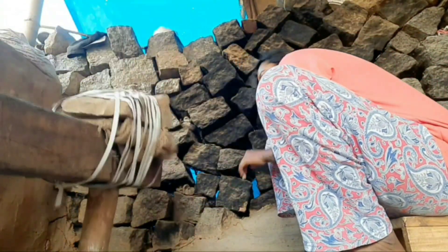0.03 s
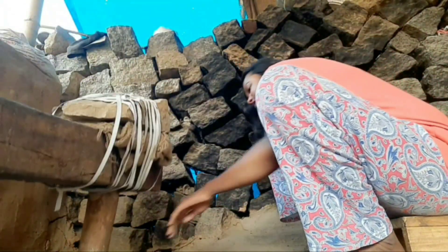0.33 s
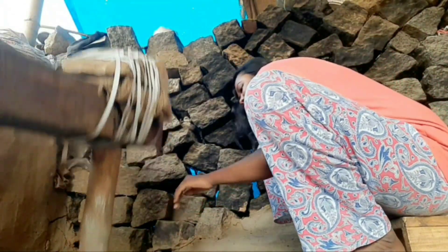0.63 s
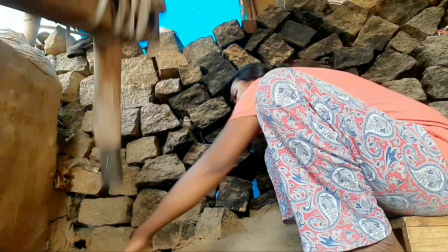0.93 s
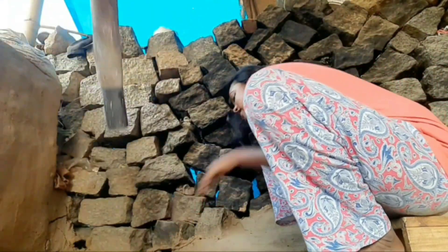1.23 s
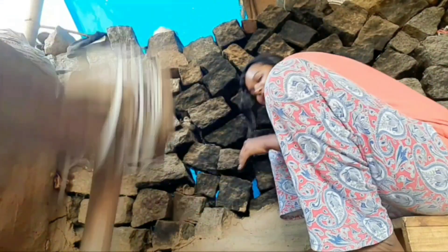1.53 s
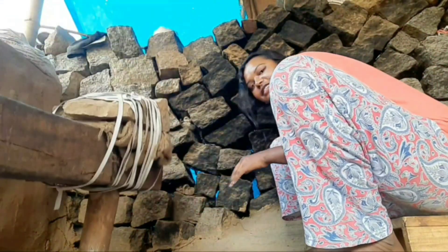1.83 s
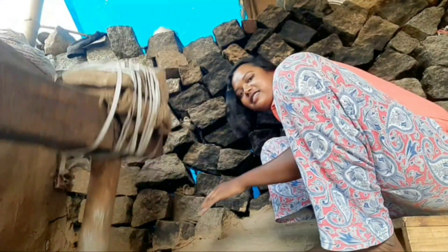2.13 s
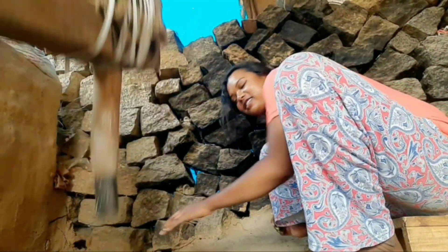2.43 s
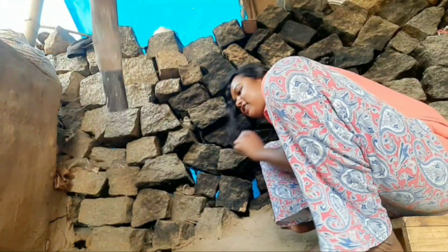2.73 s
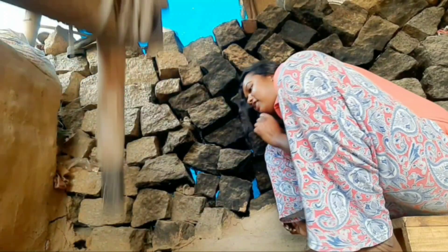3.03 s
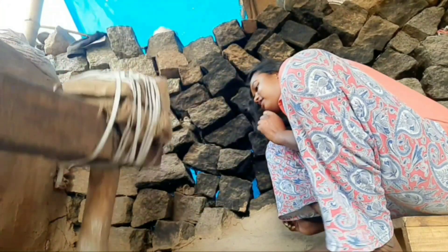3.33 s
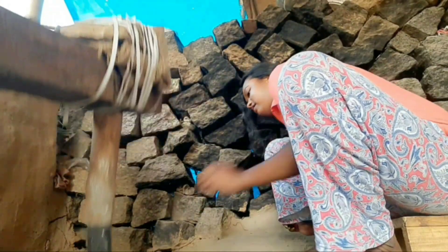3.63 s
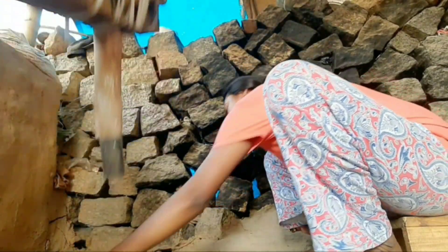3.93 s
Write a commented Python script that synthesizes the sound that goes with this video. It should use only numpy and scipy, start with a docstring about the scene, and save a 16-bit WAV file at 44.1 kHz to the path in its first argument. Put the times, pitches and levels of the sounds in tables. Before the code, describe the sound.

Low thuds of a wooden pestle beam pound meal in a steady, slow rhythm in a stone-walled yard. Two crunching blows are each followed by a short pivot squeak and faint sweeping, then a louder third blow cracks on stone.

```python
"""A stone-walled yard: a foot-worked wooden beam drops its pestle three times into a mortar of meal. Crunching
meal cushions two blows; the third strikes through hard. Beam, mortar and ground ring low, wood cracks on stone
and grit, and the beam knocks in its bearing. Between blows the dry pivot rubs and squeaks by stick-slip, the
pestle scrapes the mortar rim, and a hand sweeps the meal back. Still air and a faint low hum lie beneath."""
import sys
import numpy as np
from scipy import signal
from scipy.fft import rfft, irfft
from scipy.io import wavfile

SR = 44100
rng = np.random.default_rng(int(sys.argv[2]) if len(sys.argv) > 2 else 0)


def waveform_to_disk(signal):
    """Save audio, clipped to [-1, 1], as 16-bit WAV at the path in sys.argv[1]."""
    frames = np.transpose(np.atleast_2d(signal))
    scaled = np.clip(frames, -1, 1) * 32767
    samples = np.round(scaled).astype(np.int16)
    wavfile.write(sys.argv[1], SR, samples)


N = 176400
TIME_S, BIN_HZ = np.arange(N) / SR, np.fft.rfftfreq(N, 1 / SR)


def amp(db):
    """Decibels to gain."""
    return 10 ** (np.asarray(db) / 20)


def unit(x):
    """Scale to rms 1."""
    return x / np.sqrt(np.mean(x ** 2) + 1e-20)


def curve(points, at_hz=BIN_HZ):
    """Interpolate over log frequency."""
    hz, value = np.transpose(points)
    return np.interp(np.log(at_hz + 1), np.log(hz), value)


def colour(x, spectrum_db):
    """Spectral shaping, rms 1."""
    return unit(irfft(rfft(x) * amp(curve(spectrum_db)), N))


def resonate(x, hz, width_hz):
    """Two-pole resonance, rms 1."""
    return unit(irfft(rfft(x) / (1 + 2j * (BIN_HZ - hz) / width_hz) ** 2, N))


def drift(rate_hz):
    """Low-passed random wander, rms 1."""
    return unit(irfft(rfft(rng.standard_normal(N)) * np.exp(-(BIN_HZ / rate_hz) ** 2), N))


def grains(per_s, spread_db):
    """Random train of uneven clicks."""
    sign = rng.choice([-1., 1.], N)
    size = amp(spread_db * np.minimum(rng.exponential(1, N), 4))
    return sign * size * (rng.random(N) < per_s / SR)


def swell(peak_s, rise_s, fall_s):
    """Asymmetric Gaussian envelope."""
    t = TIME_S - peak_s
    return np.exp(-np.minimum((t / np.where(t < 0, rise_s, fall_s)) ** 2 / 2, 20))


def add(mix, start_s, sound):
    """Mix in at start_s."""
    part = mix[round(start_s * SR):][:len(sound)]
    part += sound[:len(part)]


# Direct-path balance: (frequency [Hz], left minus right [dB])
DIRECT_PAN = [(60, 1.6), (200, 3.3), (450, 2.9), (1300, 11.8), (2000, 7.5), (4000, 15), (13000, 7.4)]
RIGHT_LAG_S = 0.0003753


def direct(x, pan=DIRECT_PAN):
    """Direct path: the left microphone leads; balance varies with frequency."""
    side, spectrum = amp(curve(pan) / 2), rfft(x)
    lag = np.exp(-2j * np.pi * BIN_HZ * RIGHT_LAG_S)
    return irfft(np.array([spectrum * side, spectrum / side * lag]), N)


# Scattered source: (frequency [Hz], left-right coherence [0..1])
COHERENCE = [(150, 0.86), (450, 1), (1300, 0.54), (2500, .25), (5000, .05)]


def scattered(source, pan):
    """Spread source: the channels agree in the bass, differ in the treble."""
    coherence = np.clip(curve(COHERENCE), 0, 1)
    left, independent = rfft(source()), rfft(source())
    lag = np.exp(-2j * np.pi * BIN_HZ * RIGHT_LAG_S)
    right = coherence * left * lag + np.sqrt(1 - coherence ** 2) * independent
    side = amp(curve(pan) / 2)
    return irfft(np.array([left * side, right / side]), N)


# Yard decay: (frequency [Hz], t60 [s])
WALL_DECAY = [(60, 0.38), (300, .3), (700, 0.24), (1300, 0.22), (3000, 0.25), (8000, 0.28), (16000, 0.2)]


def walls(x):
    """Short diffuse tail off the stone walls."""
    taps = rng.standard_normal((2, SR // 2)) * (rng.random((2, SR // 2)) < .1)
    taps[:, :round(.004 * SR)] = 0
    hz, t, frames = signal.stft(taps, SR, nperseg=256)
    tail = signal.istft(frames * amp(-60 * t / curve(WALL_DECAY, hz)[:, None]), SR, nperseg=256)[1]
    tail /= np.linalg.norm(tail, axis=1, keepdims=True)
    return signal.fftconvolve(np.atleast_2d(x), tail, axes=1)[:, :N]


def yard(x, walls_db, pan=DIRECT_PAN):
    """Direct path plus walls."""
    return direct(x, pan) + amp(walls_db) * walls(x)


# Air noise: (frequency [Hz], relative density [dB])
AIR_SPECTRUM = [(15, -42), (25, -15.5), (58, -8.5), (86, -0.5), (194, -20), (307, -19.5), (486, -27),
                (710, -25.5), (1120, -33), (1280, -31), (3220, -40), (7830, -39), (9460, -44),
                (14600, -39.5), (15800, -44)]


def still_air(level_db=-68):
    """Outdoor noise floor, near mono in the bass."""
    common, separate = rfft(rng.standard_normal(N)), rfft(rng.standard_normal((2, N)))
    share = curve([(100, 0.93), (500, 0.66), (2000, 0.031)])
    noise = irfft(common * np.sqrt(share) + separate * np.sqrt(1 - share), N)
    return amp(level_db) * colour(noise, AIR_SPECTRUM)


# Hum partials: (frequency [Hz], level [dB])
HUM_TONES = [(74, -66), (91, -65)]
# Hum envelope: (time [s], gain [dB])
HUM_GAIN = [(0, -2), (.7, 3.5), (1.3, 3), (2.3, 3), (2.8, -6), (3.3, -12), (4, -14.5)]


def hum(waver_hz=1.5):
    """Two faint low tones, wavering in pitch."""
    tones = sum(amp(db) * np.sin(2 * np.pi * np.cumsum(hz + waver_hz * drift(3.2)) / SR)
                for hz, db in HUM_TONES)
    return direct(tones * amp(np.interp(TIME_S, *np.transpose(HUM_GAIN))))


# Dry wood rubbing at the pivot and the pestle scraping the mortar rim: (peak time [s], rise [s], fall [s],
# level [dB], resonance [Hz], width [Hz])
RUBS_AND_SCRAPES = [(.07, 0.097, 0.081, -72, 1316, 68.6), (0.018, 0.033, 0.028, -68.5, 725, 1260),
                    (.26, 0.043, 0.059, -63.5, 1294, 113), (0.242, 0.02, 0.02, -63.5, 460, 122),
                    (0.293, 0.011, 0.0053, -47.5, 1140, 1020), (.72, 0.038, 0.05, -82.5, 2650, 500),
                    (.95, 0.014, 0.029, -91, 3970, 600), (.86, .015, .02, -77, 640, 195),
                    (1.135, .025, 0.026, -66, 794, 140), (1.17, 0.0035, 0.019, -55.5, 480, 493),
                    (1.235, 0.032, 0.13, -61, 795, 142), (1.35, 0.075, 0.023, -57.5, 408, 93),
                    (1.3, 0.085, 0.11, -66.5, 171, 204), (1.29, 0.051, 0.22, -65, 1880, 590),
                    (1.55, 0.04, 0.11, -69, 1996, 400), (1.781, 0.047, 0.14, -73.5, 1890, 400),
                    (2.78, 0.041, 0.071, -70.5, 1990, 500), (1.781, 0.011, 0.05, -56, 514, 423),
                    (1.871, 0.0073, 0.039, -57.5, 1334, 170), (1.907, 0.0031, 0.028, -45, 1170, 1150),
                    (1.939, .015, 0.018, -40.5, 401, 89), (2.391, 0.022, 0.065, -70.5, 600, 608),
                    (2.39, 0.024, 0.032, -80, 2222, 700), (2.5, 0.11, 0.33, -84, 1760, 123),
                    (2.62, 0.023, 0.032, -67, 880, 450), (2.76, 0.051, 0.089, -59.5, 794, 122),
                    (2.915, .035, 0.016, -51, 435, 90), (2.921, 0.026, 0.045, -45.5, 1333, 69),
                    (2.942, 0.05, 0.079, -63.5, 1933, 660), (2.98, 0.049, .06, -59, 648, 710),
                    (3.182, 0.019, 0.048, -67.5, 883, 202), (3.25, 0.011, 0.022, -82, 3000, 2020),
                    (3.544, 0.0037, 0.011, -39, 1210, 820), (3.4, 0.0077, 0.034, -61.5, 650, 602),
                    (3.52, 0.039, 0.022, -58.5, 474, 128.5), (3.531, 0.035, 0.024, -60, 1246, 450),
                    (3.883, 0.012, 0.028, -63.5, 880, 336), (3.89, 0.033, 0.03, -74.5, 414, 150)]


def rubs_and_scrapes():
    """Irregular slips excite one wood resonance per rub or scrape."""
    slips = grains(per_s=1500, spread_db=3.5)
    rubbing = sum(amp(db) * swell(peak_s, rise_s, fall_s) * resonate(slips, hz, width_hz)
                  for peak_s, rise_s, fall_s, db, hz, width_hz in RUBS_AND_SCRAPES)
    return yard(rubbing, walls_db=-4.5)


# Meal under the pestle: (start [s], rise [s], hold [s], release t60 [s], level [dB])
MEAL_CRUSHES = [(0.272, .05, 0.046, 0.22, -37), (1.884, 0.047, 0.027, 0.4, -38),
                (3.541, .014, 0.021, 0.21, -29.5)]
# Breaking grains: (frequency [Hz], relative density [dB])
CRUNCH_SPECTRUM = [(70, 2), (130, 0), (200, -16), (300, -9.5), (400, 0), (537, -11), (644, -0.5),
                   (800, -10), (1310, -12.5), (1520, -15.5), (2050, -16), (2900, -26.5), (5570, -24),
                   (8300, -26), (9600, -39), (11000, -33), (12900, -31), (15800, -38)]
# Crunch balance: (frequency [Hz], left minus right [dB])
CRUNCH_PAN = [(100, 1), (450, 4), (900, 7.5), (2000, 8), (4000, 1), (8000, -1), (13000, 12)]


def meal_crunch(grit_above_hz=2730, clump_hz=92, clump_db=2.5, spill_delay_s=0.13, walls_db=-10):
    """Grains break in clumps as the pestle sinks; thrown meal falls back."""
    coarse_gain, grit_gain = np.zeros((2, N))
    for start_s, rise_s, hold_s, t60_s, db in MEAL_CRUSHES:
        t = np.maximum(TIME_S - start_s, 0)
        pressure = np.minimum(t / rise_s, 1)
        release = amp(-60 * np.maximum(t - rise_s - hold_s, 0) / t60_s)
        spill = amp(-26) * swell(start_s + rise_s + hold_s + spill_delay_s, 0.0083, 0.0083)
        coarse_gain += amp(db) * (pressure * release + spill)
        grit_gain += amp(db) * (pressure ** 2.2 * release + spill)  # grit needs high pressure
    crunch = scattered(lambda: colour(grains(per_s=9700, spread_db=5.5), CRUNCH_SPECTRUM), CRUNCH_PAN)
    coarse = irfft(rfft(crunch) / (1 + (BIN_HZ / grit_above_hz) ** 10), N)
    meal = coarse_gain * coarse * amp(clump_db * drift(clump_hz)) + grit_gain * (crunch - coarse)
    return meal + amp(walls_db) * walls(meal)


def frame_shudder(level_db=-40, rise_s=0.043, t60_s=0.91):
    """The frame trembles on after each crush."""
    envelope = np.zeros(N)
    for start_s, *_ in MEAL_CRUSHES:
        t = np.maximum(TIME_S - start_s, 0)
        envelope += np.minimum(t / rise_s, 1) * amp(level_db - 60 * t / t60_s)
    return direct(envelope * resonate(rng.standard_normal(N), hz=79, width_hz=41))


# Beam against bearing, plus the hard blow's low body knocks at 3.56 s: (time [s], level [dB], pitch [Hz], t60
# [s])
BEARING_KNOCKS = [(.307, -26, 719, .03), (0.371, -28, 1986, 0.021), (.372, -26.5, 734, 0.028),
                  (1.982, -29, 1932, 0.022), (2.042, -29, 662, 0.032), (3.5565, -19.5, 706, 0.017),
                  (3.56, -7, 390, 0.0093), (3.561, -13.5, 211, 0.066)]
# Knock modes: (pitch ratio, gain [dB])
BEARING_MODES = [(.8, 0), (1, 2), (1.14, -5.5)]


def bearing_knocks(rise_s=0.0021):
    """The beam hits its bearing, and the hard blow knocks low in the body; the wood rings briefly."""
    t, out = np.arange(SR // 10) / SR, np.zeros(N)
    for start_s, db, hz, t60_s in BEARING_KNOCKS:
        ring = sum(amp(mode_db) * np.sin(2 * np.pi * hz * ratio * t + k)
                   for k, (ratio, mode_db) in enumerate(BEARING_MODES))
        add(out, start_s, ring * np.minimum(t / rise_s, 1) * amp(db - 60 * t / t60_s))
    return yard(out, walls_db=-21)


# Hard contacts: (time [s], level [dB], t60 [s], tilt [dB/octave])
PESTLE_CRACKS = [(0.3155, -29.5, .007, 3), (0.3164, -30, 0.036, -6), (.4515, -42.5, 0.007, 8),
                 (0.4652, -51, 0.036, 23), (3.5519, -22, .008, 4), (3.5541, -20, 0.012, -4)]
# Crack before tilt: (frequency [Hz], relative density [dB])
CRACK_SPECTRUM = [(200, -21), (900, -9.5), (2000, 5), (3000, -5), (5000, -7), (8000, -16.5), (10000, -33),
                  (13000, -11.5), (16000, -16)]
# Crack balance: (frequency [Hz], left minus right [dB])
CONTACT_PAN = [(500, 3.5), (2000, 9.5), (5000, 8), (13000, 7)]


def pestle_cracks():
    """Wood strikes stone and grit: brief bright noise bursts."""
    t, out = np.arange(SR // 10) / SR, np.zeros(N)
    for start_s, db, t60_s, tilt_db in PESTLE_CRACKS:
        spectrum = [(hz, band_db + tilt_db * np.log2(hz)) for hz, band_db in CRACK_SPECTRUM]
        burst = colour(rng.standard_normal(N), spectrum)[:len(t)]
        add(out, start_s, burst * amp(db - 60 * t / t60_s))
    return yard(out, walls_db=-9.5, pan=CONTACT_PAN)


# Landings and rebounds: (time [s], level [dB], contact [s], build-up [s])
PESTLE_BLOWS = [(.338, -15, 0.0032, 0.0087), (0.372, -21.5, 0.0011, 0.0069), (1.936, -14, 0.0047, 0.0097),
                (1.977, -35, 0.0037, 0.012), (3.555, -6, 0.00068, 0.0028), (3.745, -37, 0.0057, .015)]
# Beam, mortar and ground: (frequency [Hz], gain [dB], t60 [s])
BODY_MODES = [(55, -18, 0.37), (80.15, 3.5, 0.28), (111, -0.5, 0.37), (170, -6, 0.23), (197, -1, 0.13),
              (258.7, -4, .2), (296.3, -3.5, .2), (397.8, 1.5, 0.18), (452, -9, .32), (603, -22.5, 0.2),
              (690, -22.5, .14), (872, -19.5, 0.16), (990, -29, 0.12)]


def pestle_thuds():
    """A force pulse drives the heavy modes; cushioned blows build slower and sound duller."""
    t, out = np.arange(SR) / SR, np.zeros(N)
    ring = sum(amp(db - 60 * t / t60_s) * np.cos(2 * np.pi * hz * t) for hz, db, t60_s in BODY_MODES)
    for start_s, db, contact_s, build_s in PESTLE_BLOWS:
        force = t * np.exp(-t / contact_s)
        thud = signal.fftconvolve(ring, force)[:SR]
        onset = 1 - np.exp(-(t / build_s) ** 2)
        add(out, start_s, amp(db) * thud / abs(thud).max() * onset)
    return yard(out, walls_db=-11.5)


# Hand strokes: (peak time [s], rise [s], fall [s], level [dB])
HAND_SWEEPS = [(1.253, 0.012, 0.076, -62.5), (1.44, 0.11, 0.056, -58.5), (1.61, 0.065, 0.068, -62),
               (2.902, 0.069, .13, -70), (3.42, 0.013, 0.17, -70.5)]
# Sliding meal: (frequency [Hz], relative density [dB])
SWEEP_SPECTRUM = [(150, -19), (900, -4.5), (2000, -4.5), (3200, -15), (4200, -13), (8300, -16), (9600, -29),
                  (13000, -20), (15800, -29)]


def hand_sweeps():
    """Swept meal hisses over stone."""
    envelope = sum(amp(db) * swell(peak_s, rise_s, fall_s) for peak_s, rise_s, fall_s, db in HAND_SWEEPS)
    hiss = scattered(lambda: colour(grains(per_s=8900, spread_db=0.5), SWEEP_SPECTRUM),
                     pan=[(1000, 4.5), (4000, -0.5), (13000, 4.5)])
    return envelope * hiss


# Pivot squeaks: (peak time [s], lead-in [s], width [s], level [dB], pitch [Hz], sag [Hz/s],
# tilt [dB/harmonic], trail gain [dB], trail length [s])
PIVOT_SQUEAKS = [(1.369, .036, 0.011, -27, 1284, 1009, 0, -11, .022),
                 (2.954, 0.0091, 0.01, -33.5, 1271, 604, -0.54, -7, 0.028)]
# Harmonics, fundamental first: (gain [dB])
SQUEAK_HARMONICS = [13, -5, -8.5, -26, -20, -25.5, -27, -32, -31.5, -38.5, -38.5, -54]
# Squeak balance: (frequency [Hz], left minus right [dB])
PIVOT_PAN = [(1270, -1), (2550, 11.5), (3800, 3.5), (5000, 4), (12000, 9.5)]


def pivot_squeaks(glide_s=.045, chatter_db=5.5, dull_db=-24.5, echo_s=.021, echo_above_hz=3100):
    """Regular stick-slip at the top of the lift: a sagging tone, brightest at peak pressure."""
    out = np.zeros(N)
    for peak_s, lead_s, width_s, db, hz, sag_hz_per_s, tilt_db, trail_db, trail_s in PIVOT_SQUEAKS:
        first_catch = amp(-12) * swell(peak_s - lead_s, 0.012, 0.012)
        trail = amp(trail_db + chatter_db * drift(70)) * swell(peak_s + 0.035, width_s, trail_s)
        grip = first_catch + swell(peak_s, width_s, width_s) + trail
        brightness = amp(dull_db * (1 - swell(peak_s, lead_s, 0.08)))
        sag_hz = sag_hz_per_s * glide_s * np.tanh((TIME_S - peak_s) / glide_s)
        pitch_hz = (hz - sag_hz) * (1 + .004 * drift(150))
        on = grip > 1e-4
        phase = 2 * np.pi * np.cumsum(pitch_hz[on]) / SR
        for k, harmonic_db in enumerate(SQUEAK_HARMONICS):
            envelope = grip[on] ** (1 + 0.02 * k) * (brightness[on] if k else 1)
            out[on] += amp(db + harmonic_db + tilt_db * k) * envelope * np.cos((k + 1) * phase)
    # A near wall returns the upper overtones.
    high_pass = 1 - 1 / (1 + (BIN_HZ / echo_above_hz) ** 8)
    echo = amp(-5) * np.exp(-2j * np.pi * BIN_HZ * echo_s) * high_pass
    return yard(irfft(rfft(out) * (1 + echo), N), walls_db=-12.5, pan=PIVOT_PAN)


def scene():
    """Stereo sum of all sources."""
    return (still_air() + hum() + rubs_and_scrapes() + meal_crunch() + frame_shudder() + bearing_knocks()
            + pestle_cracks() + pestle_thuds() + hand_sweeps() + pivot_squeaks())


def record(dry):
    """Microphone bass roll-off and band limit."""
    low_cut_hz, high_cut_hz = 48, 15900
    x = signal.sosfilt(signal.butter(3, low_cut_hz, "high", fs=SR, output="sos"), dry)
    low_pass = signal.firwin(511, high_cut_hz, window=("kaiser", 9), fs=SR)
    return signal.oaconvolve(x, low_pass[None], "same")


dry = scene()
out = record(dry)
waveform_to_disk(out)
```